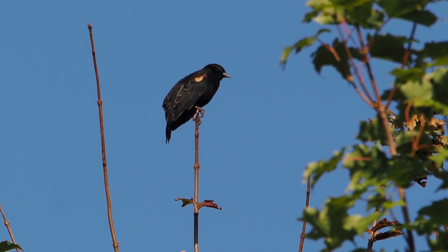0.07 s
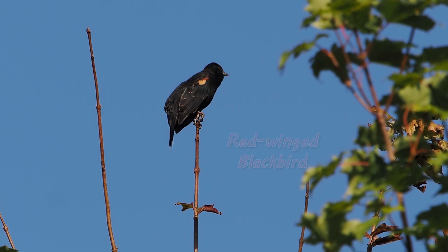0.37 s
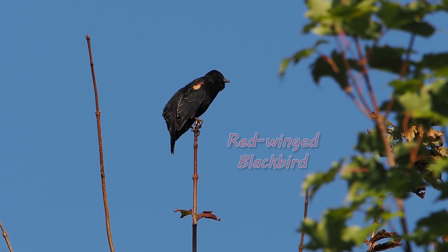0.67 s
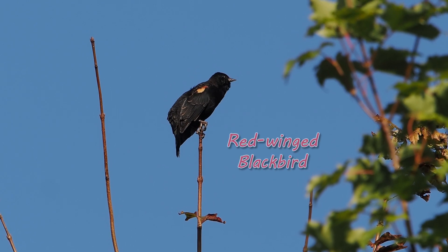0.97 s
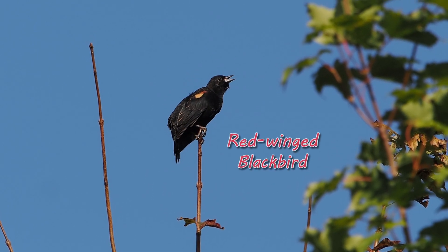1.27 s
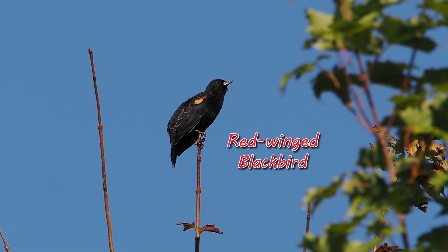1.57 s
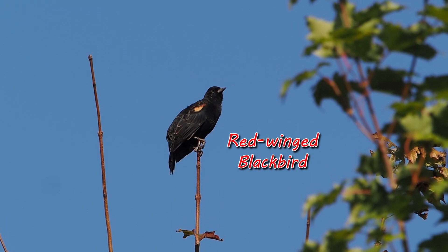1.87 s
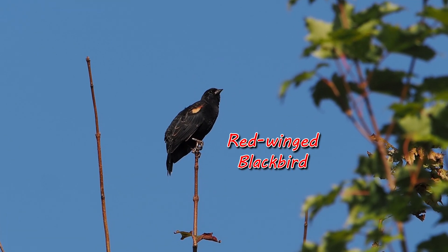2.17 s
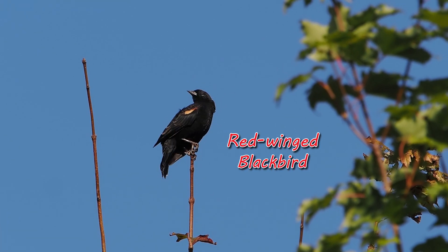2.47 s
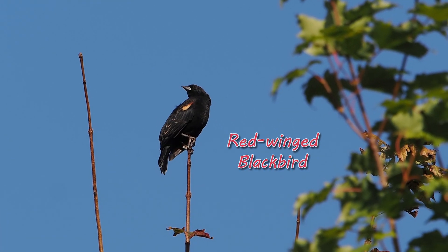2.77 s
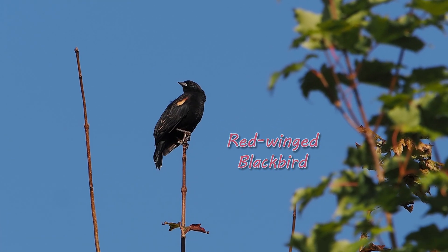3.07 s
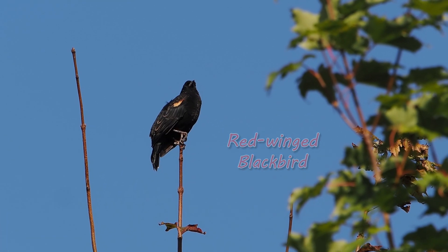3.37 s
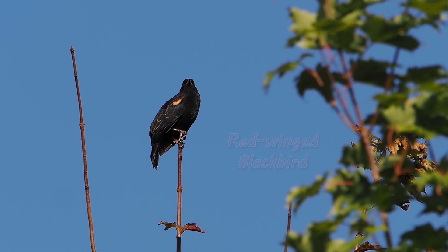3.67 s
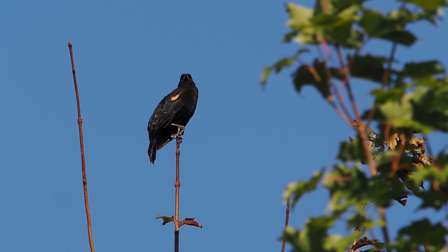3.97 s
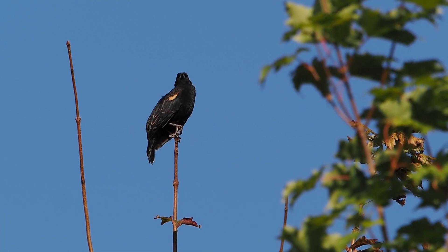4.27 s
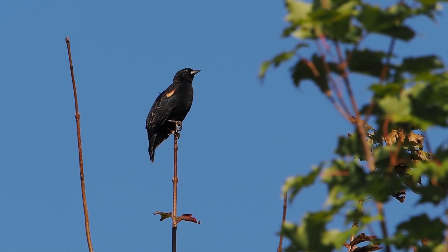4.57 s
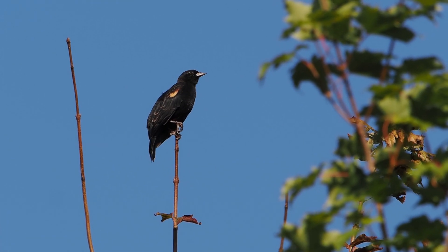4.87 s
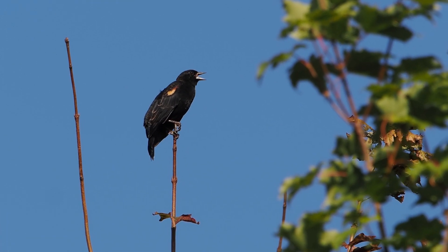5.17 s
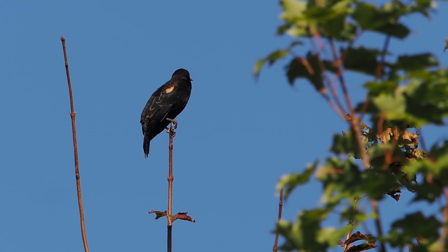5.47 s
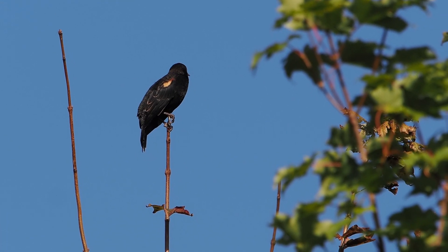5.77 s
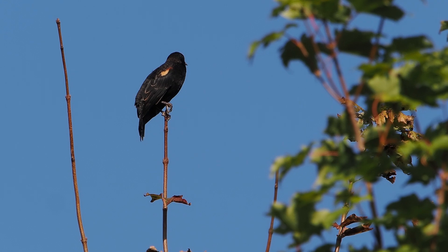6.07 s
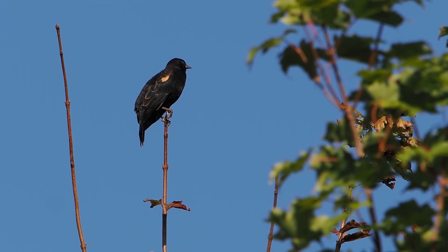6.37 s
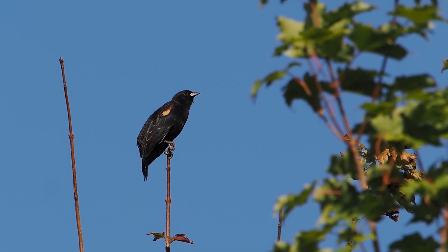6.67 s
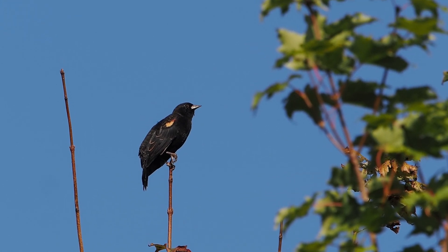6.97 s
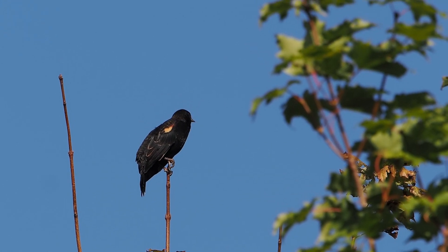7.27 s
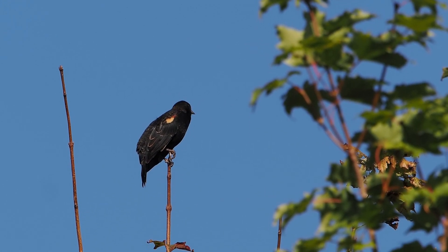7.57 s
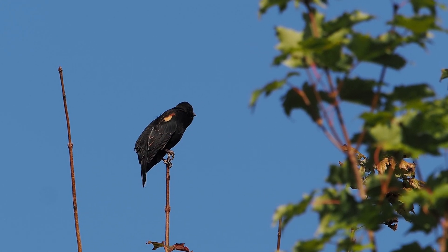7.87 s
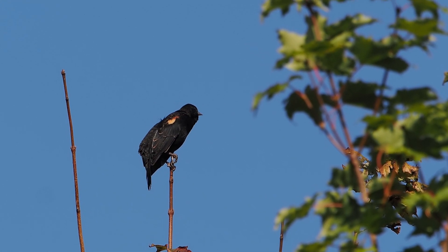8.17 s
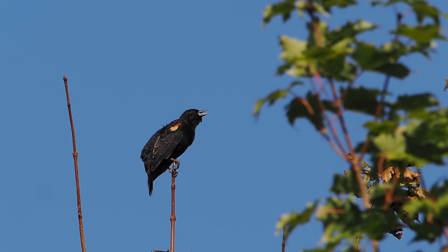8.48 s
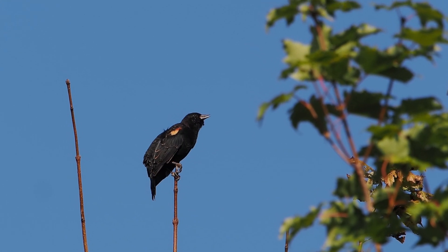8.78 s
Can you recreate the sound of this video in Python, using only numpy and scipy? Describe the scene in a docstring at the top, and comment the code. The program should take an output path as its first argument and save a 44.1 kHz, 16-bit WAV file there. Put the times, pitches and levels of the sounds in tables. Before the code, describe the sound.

A blackbird sings two harsh, buzzy trills outdoors, with short high chirps from small birds scattered between them over a faint distant rumble.

```python
"""A small bird chirps from the trees over a distant rumble. Then, out in the open before a stereo pair,
a red-winged blackbird on a bare stem sings twice: a few liquid notes, then a harsh trill from both
sides of its syrinx. Between songs it gives a dry check and a low chuck. Deeper in the foliage small
birds chirp and whistle thinly. Leaves scatter every call on its way to the microphones, and a faint
drone comes in near the end."""
import sys
import numpy as np
from scipy import signal
from scipy.fft import rfft, irfft, next_fast_len
from scipy.io import wavfile
from scipy.ndimage import uniform_filter1d, minimum_filter1d

SR = 44100
rng = np.random.default_rng(int(sys.argv[2]) if len(sys.argv) > 2 else 0)


def output_pcm(signal):
    """Save a mono or channel-first signal as 16-bit PCM at the path in sys.argv[1].

    Samples are clipped to [-1, 1] before scaling.
    """
    pcm = np.clip(np.atleast_2d(signal).T, -1, 1) * 32767
    wavfile.write(sys.argv[1], SR, np.round(pcm).astype(np.int16))


N = 393813
TIME = np.arange(N) / SR

# Levels are set ahead of filtering, foliage and the mix; pan_db is left microphone over right.
# the blackbird's trills: start_s, length_s, low_voice_db, high_voice_db, crest_after_s, low_hz,
# low_swing_hz, high_hz, high_swing_hz, high_lag_pulses, throat_tuning_ratio, pan_db
TRILLS = [(1.118, 0.46, -12.5, -20, .15, 2750, 428.8, 4333, 460.2, -0.1, 0.99, 2.5),
          (8.3839, 0.4696, -14.5, -20.5, .21, 2722, 473, 4560, 526, -.05, 0.99, 2.5)]
# beat of each trill: first_pulse_s, pulses_per_s
TRILL_BEATS = [(1.127, 60.05), (8.3874, 62.05)]
# the blackbird's throat and open beak: frequency_hz, gain_db
BLACKBIRD_THROAT = [(1600, -60.5), (1900, -44), (2150, -13.5), (2600, 10), (3000, 2.5), (3500, 4.5),
                    (3900, -6.5), (4600, -0.5), (5000, -10.5), (5350, -22.5), (5780, -4), (6200, -46.5)]
# softened top of the high voice: frequency_hz, gain_db
HIGH_VOICE_ROLLOFF = [(2000, 0.0), (5000, 0.5), (5350, -8), (5750, -6.5), (6300, -12)]
# sizzling overtones, one list per trill: frequency_hz, gain_db
SIZZLE_SPECTRA = [
    [(10600, -30), (11200, 4.5), (11700, -4), (12250, 7), (12700, -3.5), (13200, 2.5), (14000, -27.5),
     (14600, -9), (15200, -24)],
    [(10700, -34), (11300, 9), (11900, 2), (12250, 4.5), (12900, -4.5), (13500, -5), (14000, -17.5),
     (14800, -17.5)],
]
# narrow band an octave above the low voice: frequency_hz, gain_db
OCTAVE_BAND = [(5300, -25.5), (5650, 5), (5900, -3), (6250, -33)]
# course of that band, one list per trill: time_s, level_db
OCTAVE_LEVELS = [
    [(1.13, -53.5), (1.2, -39.5), (1.418, -39.5), (1.54, -59), (1.58, -66)],
    [(8.41, -65.5), (8.694, -37), (8.738, -46), (8.822, -35), (8.84, -44.5)],
]
# clear notes leading into each trill: start_s, length_s, pitch_hz, glide_hz, level_db, swell_db, pan_db
LEAD_NOTES = [(.747, 0.033, 1900, 161, -28.5, 12.5, -10), (.771, 0.021, 1925, -19.5, -16, 1, -9),
              (1.081, 0.025, 2310, -120, -27.5, 3.5, 0), (.798, 0.011, 1879, -49.5, -16.5, 0, -5.5),
              (1.035, 0.03, 1490, -38.5, -44.5, 2, -2), (1.037, 0.079, 2236, 146.5, -26, 19.5, 4),
              (1.0995, 0.015, 2303, 75, -14, 3, -11.5), (1.1, 0.037, 4850, 400.5, -40.5, 10, 2),
              (1.131, 0.0073, 4830, -800, -25, 0, 4.5), (1.155, 0.01, 2790, 248, -4.5, 0, 0),
              (8.288, .033, 1480, -130, -28.5, -6, -11.5), (8.312, 0.088, 2135, 68, -28, 6, -18.5),
              (8.346, 0.041, 2326, 181.5, -18.5, -0.5, -15.5), (8.355, 0.047, 5000, 122, -41, 11.5, 3.5),
              (8.393, 0.0073, 5020, 1, -18, 2.5, 7), (8.417, 0.0047, 2830, 83, -8.5, 3.5, 3.5)]
# tone of the liquid slide: frequency_hz, gain_db
GURGLE_TONE = [(1900, -2), (2750, -4.5), (3000, -35.5)]
# the throat during the check call: frequency_hz, gain_db
CHECK_THROAT = [(2000, -44), (2450, -15), (3250, -14), (4100, -0.5), (4800, 3.5), (5700, -9.5), (6400, -68),
                (7700, -12), (9800, -54), (12300, -21), (14200, -47)]
# small birds in the trees: start_s, length_s, top_hz, rise_hz, fall_hz, catch_hz, level_db,
# opening_against_top_db, octave_db, pan_db
CHIRPS = [(0.125, 0.04, 5470, 604, 300, 250, -18, -19.5, -53.5, 5),
          (0.41, 0.039, 5366, 250, 450, 396, -22.5, 1, -36.5, 1.5),
          (1.75, 0.044, 5550, 354.5, 551, 706.5, -17.5, -5, -57, 2.5),
          (1.876, 0.048, 5580, 249, 150.3, 101, -29.5, -10.5, -37.5, 5),
          (2.979, 0.046, 5675, 599, 497, 150, -20.5, -7.5, -40.5, 3),
          (3.029, 0.039, 4900, -2.5, 250.8, -3.5, -24, -7.5, -26, -1),
          (3.438, 0.041, 6027, 599, 800, 0, -22.5, 1.5, -34, -6.5),
          (3.973, 0.036, 5440, 503.5, 298, 99, -15.5, -6.5, -39.5, -1),
          (4.558, 0.043, 5040, 6, 352, 7, -26.5, -9.5, -36, 2.5),
          (5.696, 0.043, 5562, 255, 349.5, 450, -13, -1, -40.5, 2),
          (6.605, 0.049, 5473, 744.5, 500, 251, -19, -5.5, -41.5, -4.5),
          (6.9, 0.05, 5870, 354, 753, 301.5, -19, -7, -27, -1),
          (7.696, 0.054, 5380, 4.5, 200, 400, -20.5, -5, -32.5, 3.5)]
# their throats: frequency_hz, gain_db
CHIRP_THROAT = [(3200, -17), (4200, 2), (6100, -1), (7000, -26), (10000, -1.5), (12300, -2.5)]
# thin whistles, far left: start_s, length_s, held_hz, drop_hz, rise_hz, held_db, opening_accent_db,
# end_accent_db, pan_db
SEETS = [(0.317, .16, 7500, 1260, 612, -34, 10.5, 6.5, 11.5),
         (5.098, 0.15, 6930, 1663, 662, -25.5, 0.5, -2, 11),
         (7.179, .122, 7250, 546, 301, -51, 5.5, 17, 5.5)]
# the whistlers' throats: frequency_hz, gain_db
SEET_THROAT = [(6400, -27.5), (6950, 0), (8600, 1), (9600, -20.5)]
# two-voiced tinks, far left: start_s, level_db, pan_db
TINKS = [(2.026, -44.5, 16.5), (3.09, -41, 10.5), (4.715, -48, 18), (5.78, -41, 8)]
# soft notes from far birds: start_s, length_s, pitch_hz, glide_hz, level_db, swell_db, pan_db
FAR_NOTES = [(.56, 0.15, 1987, -59, -61.5, -3, -3), (2.385, .012, 2960, -69, -54.5, 2, -1),
             (2.84, 0.017, 3246, -700, -71.5, -0.5, -1), (2.972, 0.018, 3040, -900, -56.5, 2, 3),
             (5.972, 0.0083, 2985, -120, -49.5, -1, 6), (6.068, 0.012, 2984, 39.5, -52.5, -1.5, 3.5),
             (6.2, .025, 3294, -800, -71.5, 3.5, 0), (6.37, 0.028, 3450, 200, -68, 1.5, 3),
             (6.516, 0.063, 3040, -400, -48, 3, -3), (6.712, 0.032, 2020, -91.5, -34, 0.5, 10.5),
             (6.757, 0.01, 8090, -150, -44.5, -1, -5), (6.905, 0.025, 2910, -700, -53, 1.5, 0.5),
             (6.921, 0.01, 4293, -450, -24.5, -2, -4.5), (7.9, 0.18, 1962, -36, -60, 0.5, -3.5),
             (8.15, .1, 2520, -80.5, -65.5, 0.5, -0.5)]
# distant rumble: frequency_hz, gain_db
RUMBLE_SPECTRUM = [(20, -6), (58, 1.5), (100, -4), (200, -7.5), (270, -13.5), (400, -8.5), (600, -13.5),
                   (1000, -10.5), (1300, -16), (1700, -26), (2100, -34.5), (2600, -43)]
# its width across the pair: frequency_hz, side_against_mid_db
RUMBLE_WIDTH = [(60, -32), (180, -18), (350, -16.5), (700, -12), (1500, -7), (4000, -2.5)]
# it swells during each song: start_s, length_s, rise_db
RUMBLE_SWELLS = [(1.021, .64, 9), (8.276, .7, 10.5)]
# faint high hiss: frequency_hz, gain_db
AIR_HISS = [(1470, -34), (2500, 1), (4640, -6), (6740, -4.5), (10800, -17.5), (13100, -13), (15500, -38)]
# two narrow steady bands of hiss: frequency_hz, gain_db
THIN_HISS = [(5100, -20), (5550, 1), (6200, -14.5), (6800, -14.5), (6950, 1.5), (7150, -18.5)]


def trills(attacks_s=(0.059, 0.071), high_entry_s=0.062, beak_opening_s=0.12, effort_span_s=.25):
    """Both sides of the syrinx warble in step and sag away from the crest of effort; overtones sizzle."""
    out = np.zeros((2, N))
    for row, (first_s, pulses_per_s), attack_s, sizzle_spectrum, octave_levels in zip(
            TRILLS, TRILL_BEATS, attacks_s, SIZZLE_SPECTRA, OCTAVE_LEVELS):
        (start_s, length_s, low_db, high_db, crest_s,
         low_hz, low_swing_hz, high_hz, high_swing_hz, lag, tuning, pan_db) = row
        t, window = stroke(length_s, attack_s, release_s=.03)
        window = window ** 1.2
        sag = ((t - crest_s) / effort_span_s) ** 2
        pulse = pulses_per_s * (start_s + t - first_s)
        low = syrinx_side(t, pulse, low_hz, low_swing_hz, tuning, limp=0.2,
                          accent=0.51, accent_at=0.053, throb=0.27, rough_hz=104, rasp=0.49)
        high = syrinx_side(t, pulse - lag, high_hz - 251 * sag, high_swing_hz, tuning, limp=0.15,
                           accent=0.36, accent_at=0.88, throb=-0.11, rough_hz=197.9, rasp=0.87)
        octave_db = np.interp(start_s + t, *np.transpose(octave_levels)) - 2
        octave = np.sqrt(window) * from_db(octave_db) * rms_one(colour(low ** 2, OCTAVE_BAND))
        low *= window * from_db(low_db - 0.93 * sag)
        high *= window * ramp(t / high_entry_s) * from_db(high_db - 8.5 * sag)
        sizzle = from_db(-14) * colour((high + 0.23 * low) * rng.standard_normal(len(t)), sizzle_spectrum)
        add(out, start_s, low + colour(high, HIGH_VOICE_ROLLOFF) + octave, pan_db)
        add(out, start_s, ramp(t / beak_opening_s) * sizzle, pan_db=-21)   # the beak lets the top out
    return out


def syrinx_side(t, pulse, centre_hz, swing_hz, tuning, limp, accent, accent_at, throb, rough_hz, rasp):
    """One voice dips twice a pulse, unevenly; a rattle roughens it and a flutter throws sidebands."""
    angle = 2 * np.pi * (pulse + .02 * waver(t, 40))
    swing = swing_hz * (1 + .15 * waver(t, 50))
    hz = centre_hz - swing * (np.cos(2 * angle) + limp * np.cos(angle))
    hz += rough_hz * waver(t, 500) + 55.1 * waver(t, 30)   # fast roughness, slow wander
    beat = accent * np.cos(angle - 2 * np.pi * accent_at) + throb * np.cos(2 * angle + 0.8)
    rattle = .4 * np.cos(4 * angle + 1.3 * waver(t, 130)) + 0.25 * waver(t, 450)
    flutter = 1 + rasp * np.cos(turn(850 + 160 * waver(t, 150.7)))
    voice = np.exp(beat + rattle) * flutter * np.sin(turn(hz))
    return rms_one(colour(voice, np.multiply(BLACKBIRD_THROAT, [tuning, 1])))


def notes(rows, rough_hz, rough_rate_hz, octave_db, taper):
    """Short clear notes that glide evenly through their pitch as they swell or fade."""
    out = np.zeros((2, N))
    for start_s, length_s, pitch_hz, glide_hz, level_db, swell_db, pan_db in rows:
        progress = np.linspace(0, 1, int(length_s * SR))
        hz = pitch_hz + glide_hz * (progress - .5) + rough_hz * waver(progress, rough_rate_hz)
        level = from_db(level_db + swell_db * progress - max(swell_db, 0))
        window = signal.windows.tukey(len(progress), taper)
        add(out, start_s, window * level * tone(hz, octave_db), pan_db)
    return out


def gurgle(start_s=.806, length_s=0.19, end_hz=2365, slide_hz=300, slide_s=.038, fade_db=27):
    """In the first song a whistle slides down and fades; a slower vibration sets a line either side."""
    out = np.zeros((2, N))
    t, window = stroke(length_s, attack_s=.018, release_s=.02)
    hz = end_hz + slide_hz * np.exp(-(t / slide_s) ** 2) + 55 * waver(t, 200)
    beat_hz = 345 + 25 * waver(t, 74)
    lines = sum(from_db(db) * np.sin(turn(hz + k * beat_hz)) for k, db in ((-1, -2), (0, 0), (1, -16)))
    level = window * from_db(-25 - fade_db * (t / length_s) ** 1.6)
    add(out, start_s, colour(level * lines, GURGLE_TONE), pan_db=-3)
    return out


def check(start_s=5.257, pitch_hz=797.6, lift_hz=100, lift_at_s=0.0152, lift_width_s=.005, breath_db=-9):
    """Dry, rough harmonics shaped by the throat; midway the pitch lifts and the fifth one whistles."""
    out = np.zeros((2, N))
    t, window = stroke(length_s=0.038, attack_s=0.007, release_s=.006)
    lift = np.exp(-((t - lift_at_s) / lift_width_s) ** 2)
    phase = turn(pitch_hz + lift_hz * lift + 14 * waver(t, 400))
    stack = rms_one(sum(np.sin(k * phase) for k in range(2, 18)))
    breath = from_db(breath_db) * rng.standard_normal(len(t))
    voice = (1 - .5 * lift) * rms_one(colour(stack + breath, CHECK_THROAT))
    whistle = from_db(-2) * lift * np.sqrt(2) * np.sin(5 * phase)
    add(out, start_s, window * from_db(-15.5) * (voice + whistle), pan_db=-1)
    return out


def chuck(start_s=6.571, pulses_per_s=52):
    """A single swing of the blackbird's low voice: up, down and up again."""
    out = np.zeros((2, N))
    t, window = stroke(length_s=0.015, attack_s=0.002, release_s=0.0057)
    voice = syrinx_side(t, pulses_per_s * (t - .009), centre_hz=2950, swing_hz=450, tuning=0.938,
                        limp=0.069, accent=.1, accent_at=0, throb=0, rough_hz=99, rasp=0.29)
    add(out, start_s, window * from_db(-20) * voice, pan_db=4.5)
    return out


def chirps(crest_share=.58, flick_hz=1090, flick_s=0.0043, catch_s=.0125, catch_width_s=.0035):
    """Small birds in the trees: each chirp flicks up, catches briefly, then arches over its top."""
    out = np.zeros((2, N))
    for row in CHIRPS:
        start_s, length_s, top_hz, rise_hz, fall_hz, catch_hz, top_db, opening_db, octave_db, pan_db = row
        t, window = stroke(length_s, attack_s=0.0027, release_s=0.0061)
        before = ramp(1 - t / length_s / crest_share)
        after = ramp((t / length_s - crest_share) / (1 - crest_share))
        catch = np.exp(-((t - catch_s) / catch_width_s) ** 2)
        arch_hz = top_hz - rise_hz * before ** 2 - fall_hz * after ** 2
        hz = arch_hz - flick_hz * np.exp(-t / flick_s) - catch_hz * catch
        rough_hz = 70 * from_db(.7 * (octave_db + 39))   # driven harder: more octave, rougher pitch
        level = window * from_db(top_db + opening_db * before - 2 * catch)
        add(out, start_s, level * tone(hz + rough_hz * waver(t, 220), octave_db), pan_db)
    return colour(out, CHIRP_THROAT)


def seets(buzz_hz=125, buzz_from_share=0.49, upper_ratio=1.12, drop_s=0.013, accent_s=.028):
    """Far, thin two-voiced whistles drop, hold, and end in a rising buzz as the upper voice fades."""
    out = np.zeros((2, N))
    for start_s, length_s, held_hz, drop_hz, rise_hz, held_db, opening_db, end_db, pan_db in SEETS:
        t, window = stroke(length_s, attack_s=0.0043, release_s=0.0027)
        ending = ramp((t / length_s - buzz_from_share) / (1 - buzz_from_share))
        depth_hz = 120 + 280 * ending
        buzz = np.sin(turn(buzz_hz * (1 + 0.074 * waver(t, 46)))) + .5 * waver(t, 450)
        hz = held_hz + drop_hz * np.exp(-t / drop_s) + rise_hz * ending ** 2 + depth_hz * buzz
        upper = from_db(-7 - 6 * ending) * np.sin(turn(upper_ratio * hz + depth_hz * waver(t, 300)))
        level = window * from_db(held_db + opening_db * np.exp(-t / accent_s) + end_db * np.sqrt(ending))
        add(out, start_s, level * rms_one(np.sin(turn(hz)) + upper), pan_db)
    return colour(out, SEET_THROAT)


def tinks(pitches_hz=(7220, 8200), length_s=0.017, rise_hz=300):
    """A far bird sings two slightly rising notes at once."""
    rows = [(start_s, length_s, hz, rise_hz, level_db + 2.5, 0, pan_db)
            for start_s, level_db, pan_db in TINKS for hz in pitches_hz]
    return notes(rows, rough_hz=60, rough_rate_hz=75, octave_db=-57, taper=0.55)


def among_trees(x, leaves_db, leaves_t60_s, trees_db, trees_t60_s):
    """Near leaves scatter quick echoes, farther trees a longer tail; each microphone gets its own."""
    t = TIME[:SR // 2]
    echoes = 0
    for db, t60_s, start_s in ((leaves_db, leaves_t60_s, .001), (trees_db, trees_t60_s, .015)):
        spray = rng.standard_normal((2, len(t))) * from_db(-60 * t / t60_s) * (t > start_s)
        echoes += from_db(db) * rms_one(spray) / np.sqrt(len(t))
    return x + signal.fftconvolve(x, echoes, axes=1)[:, :N]


def off_axis(x, lag_s=0.00013):
    """Sound from the side reaches the right microphone a little later."""
    return np.array([x[0], np.interp(TIME - lag_s, TIME, x[1])])


def background(start_s=0.051, rumble_db=-57.5, air_db=-84, thin_db=-86):
    """Far rumble, nearly the same at both microphones, and a trace of high hiss with two thin bands."""
    mid, side = rng.standard_normal((2, N))
    noise = mid + colour(side, RUMBLE_WIDTH) * [[1], [-1]]
    swell_db = sum(rise_db * ramp(np.minimum(TIME - from_s, from_s + length_s - TIME) / 0.014)
                   for from_s, length_s, rise_db in RUMBLE_SWELLS)
    rumble = from_db(rumble_db + swell_db) * rms_one(colour(noise, RUMBLE_SPECTRUM))
    white = rng.standard_normal((2, N))
    air = from_db(air_db) * rms_one(colour(white, AIR_HISS))
    thin = from_db(thin_db) * rms_one(colour(white, THIN_HISS))
    return ramp((TIME - start_s) / 0.013) * (rumble + air + thin)


def drone(start_s=8.28, start_hz=204, rise_hz_per_s=37, level_db=-55):
    """A faint wavering drone, perhaps a far motor, creeps up in pitch near the end."""
    out = np.zeros((2, N))
    t, window = stroke(N / SR - start_s, attack_s=.005, release_s=0.0045)
    hz = start_hz + rise_hz_per_s * t + 7 * waver(t, 58)
    add(out, start_s, window * from_db(level_db) * tone(hz, octave_db=-18), pan_db=0)
    return out


def from_db(db):
    """Decibels to gain."""
    return 10 ** (np.asarray(db) / 20)


def rms_one(x):
    """Scale to unit power."""
    return x / np.sqrt(np.mean(x ** 2) + 1e-20)


def ramp(x):
    """Hold a slope between 0 and 1."""
    return np.clip(x, 0, 1)


def colour(x, spectrum):
    """Filter by (frequency_hz, gain_db) points on a log-frequency axis, closed beyond the ends."""
    hz, db = np.transpose(spectrum)
    size = next_fast_len(x.shape[-1] + 2048)
    log_hz = np.log(np.fft.rfftfreq(size, 1 / SR) + 1)
    outside = np.abs(log_hz - np.clip(log_hz, np.log(hz[0]), np.log(hz[-1])))
    gain = from_db(np.interp(log_hz, np.log(hz), db) - 100 * outside)
    return irfft(rfft(x, size) * gain, size)[..., :x.shape[-1]]


def waver(t, rate_hz):
    """Smooth random drift of unit power, changing at about the given rate."""
    pole = np.exp(-2 * np.pi * rate_hz / SR)
    drift = signal.lfilter([1], [1, -2 * pole, pole * pole], rng.standard_normal(len(t) + 2000))
    return rms_one(drift[2000:])


def turn(hz):
    """Running phase of a pitch track."""
    return 2 * np.pi * np.cumsum(hz) / SR


def tone(hz, octave_db):
    """A sine of unit power plus a weak octave."""
    return np.sqrt(2) * (np.sin(turn(hz)) + from_db(octave_db) * np.sin(2 * turn(hz)))


def stroke(length_s, attack_s, release_s):
    """Time since a sound began, and its envelope: attack, hold, release."""
    t = np.arange(int(length_s * SR)) / SR
    return t, ramp(np.minimum(t / attack_s, (t[-1] - t) / release_s))


def add(out, start_s, sound, pan_db):
    """Place a sound in time and across the stereo pair."""
    i = round(start_s * SR)
    out[:, i:i + len(sound)] += rms_one(from_db([[pan_db / 2], [-pan_db / 2]])) * sound[:N - i]


def scene():
    """The blackbird sits in the open; the small birds are farther off, deeper in the foliage."""
    blackbird = trills() + gurgle() + check()
    blackbird += notes(LEAD_NOTES, rough_hz=25, rough_rate_hz=340, octave_db=-65, taper=0.85)
    far_birds = seets() + tinks()
    far_birds += notes(FAR_NOTES, rough_hz=27, rough_rate_hz=260, octave_db=-64.5, taper=0.44)
    in_the_open = among_trees(blackbird, leaves_db=-8.5, leaves_t60_s=.08, trees_db=-19, trees_t60_s=.23)
    in_the_leaves = among_trees(off_axis(chirps()),
                                leaves_db=-7, leaves_t60_s=.11, trees_db=-13.5, trees_t60_s=.2)
    low_call = among_trees(chuck(), leaves_db=-5.5, leaves_t60_s=.081, trees_db=-10, trees_t60_s=.23)
    far_off = among_trees(far_birds, leaves_db=1, leaves_t60_s=.066, trees_db=-5, trees_t60_s=.28)
    birds = from_db(0.03) * in_the_open + low_call + from_db(2.5) * in_the_leaves + from_db(-6) * far_off
    return birds + background() + drone()


def record(dry, ceiling=0.84, limiter_samples=181, cutoff_hz=16200):
    """Behind the microphones a quick limiter holds the highest peaks; the top is cut steeply."""
    allowed_gain = np.minimum(1, ceiling / (np.abs(dry).max(axis=0) + 1e-9))
    gain = uniform_filter1d(minimum_filter1d(allowed_gain, limiter_samples), limiter_samples)
    return signal.sosfilt(signal.cheby2(14, 70, cutoff_hz, fs=SR, output="sos"), dry * gain)


dry = scene()
out = record(dry)
output_pcm(out)
```